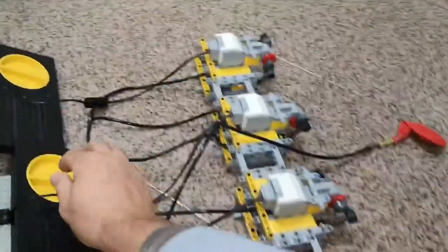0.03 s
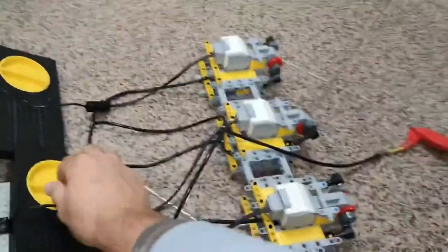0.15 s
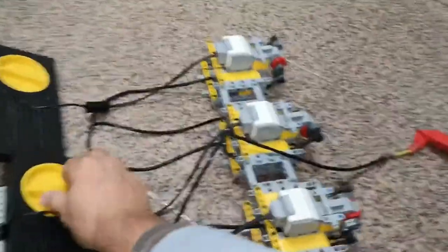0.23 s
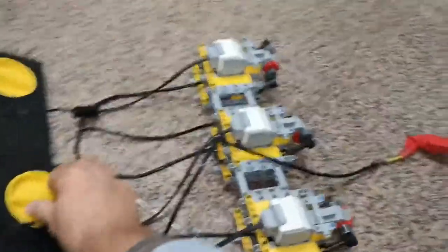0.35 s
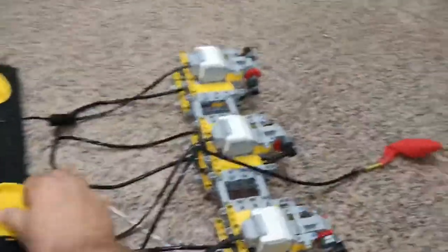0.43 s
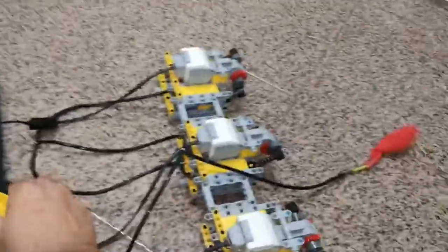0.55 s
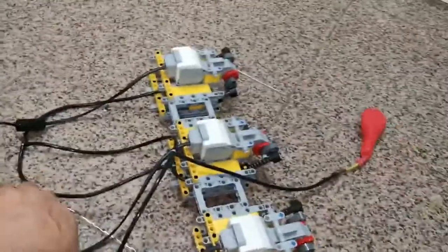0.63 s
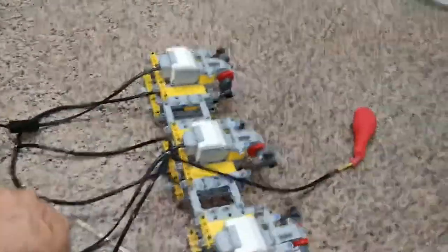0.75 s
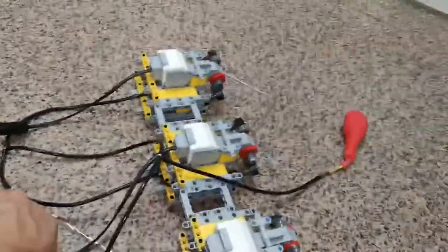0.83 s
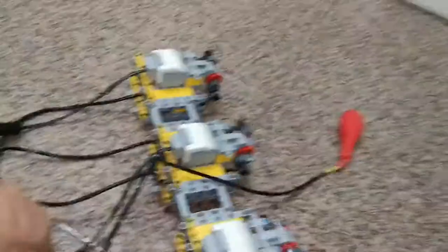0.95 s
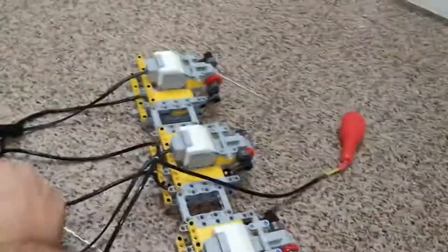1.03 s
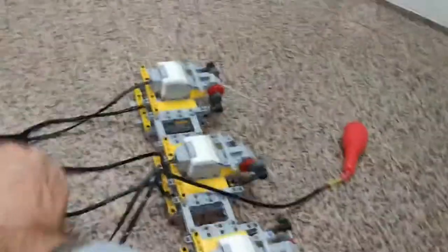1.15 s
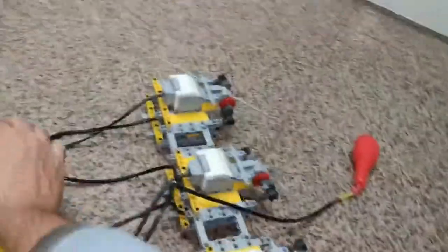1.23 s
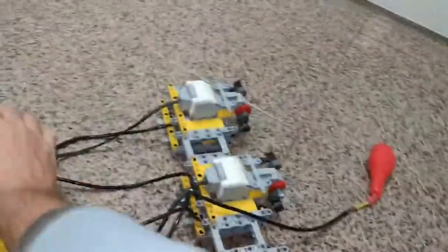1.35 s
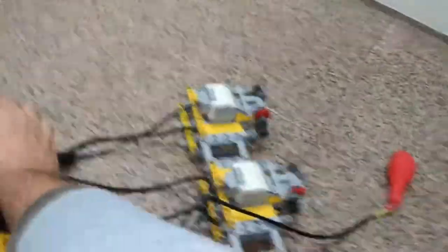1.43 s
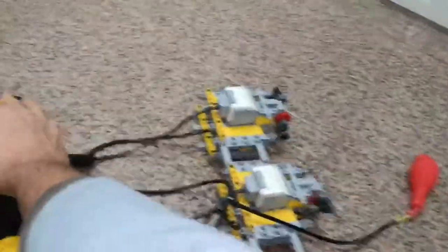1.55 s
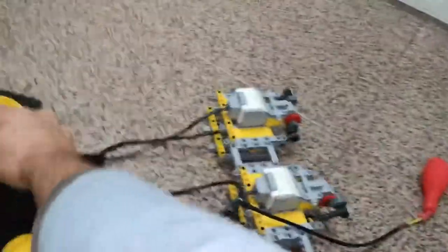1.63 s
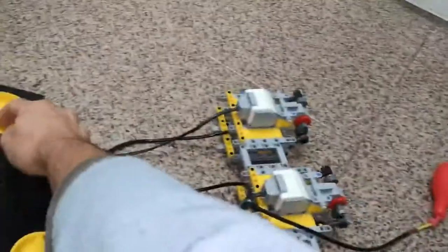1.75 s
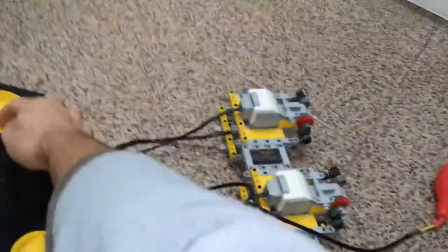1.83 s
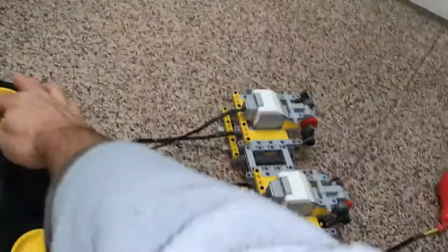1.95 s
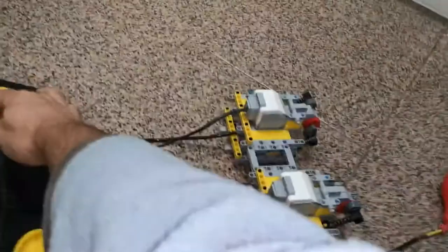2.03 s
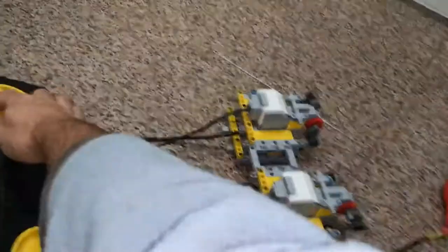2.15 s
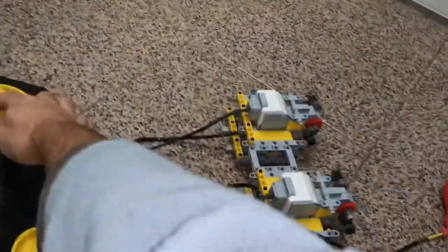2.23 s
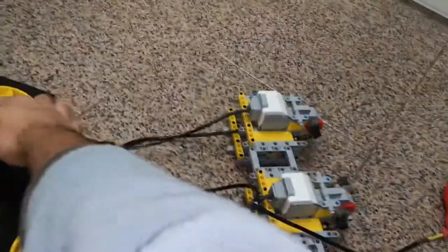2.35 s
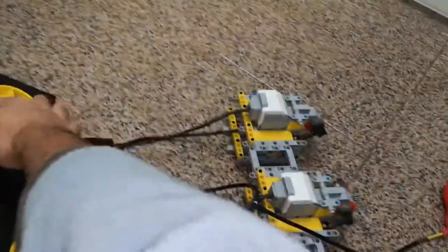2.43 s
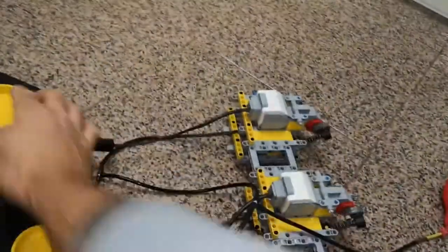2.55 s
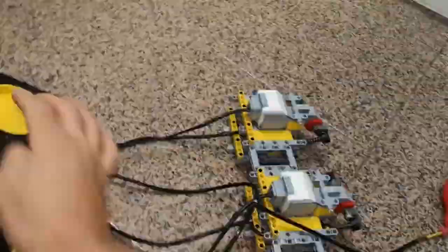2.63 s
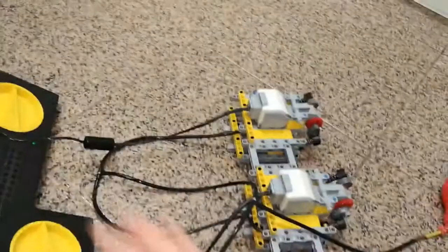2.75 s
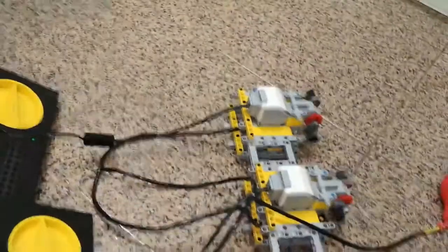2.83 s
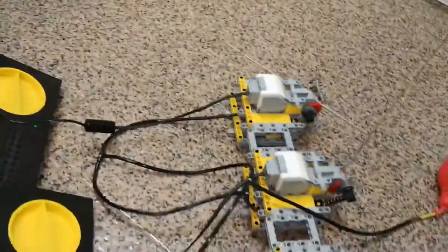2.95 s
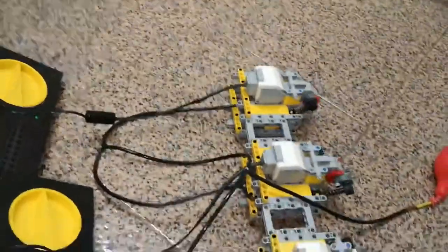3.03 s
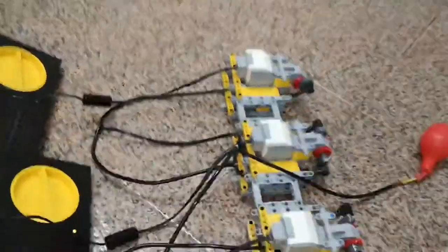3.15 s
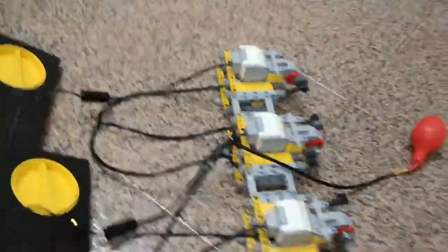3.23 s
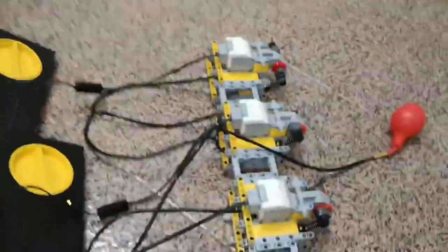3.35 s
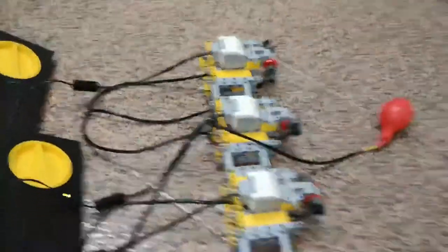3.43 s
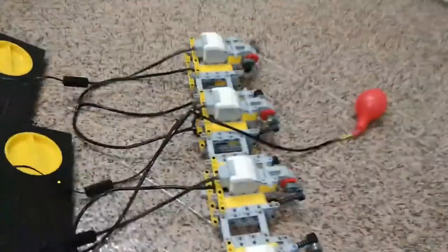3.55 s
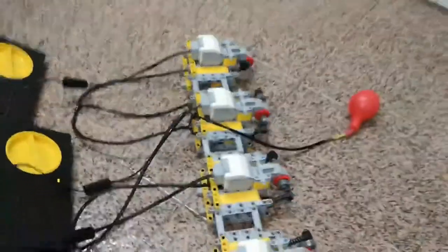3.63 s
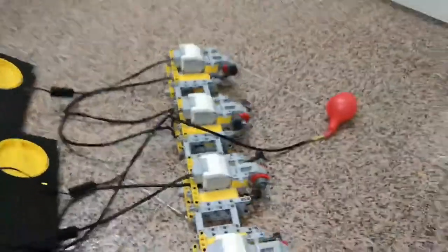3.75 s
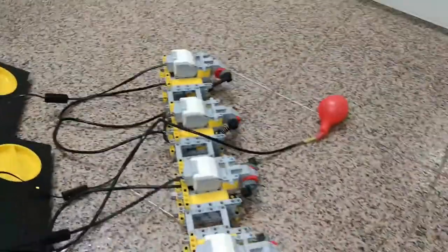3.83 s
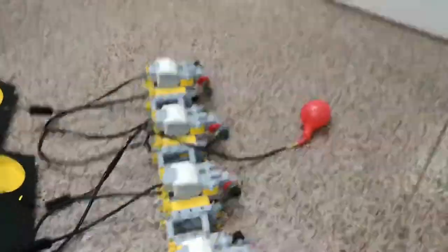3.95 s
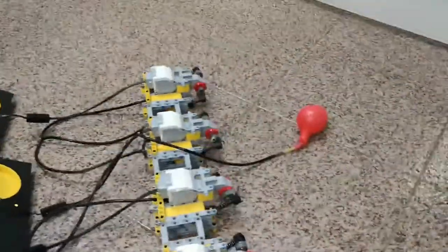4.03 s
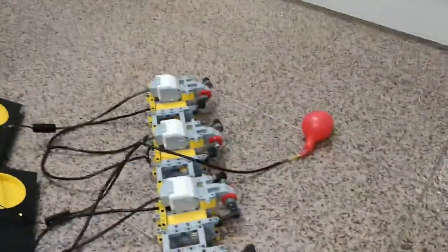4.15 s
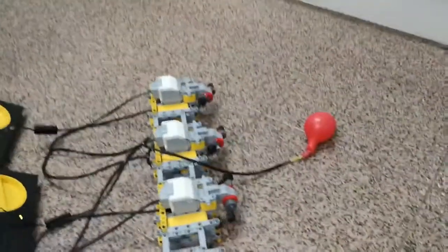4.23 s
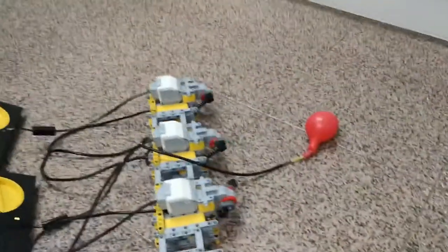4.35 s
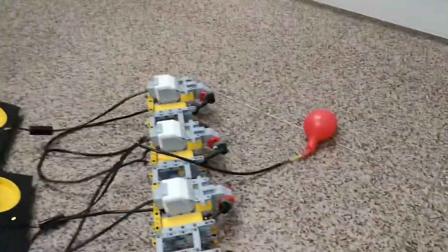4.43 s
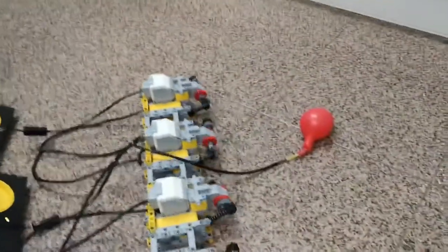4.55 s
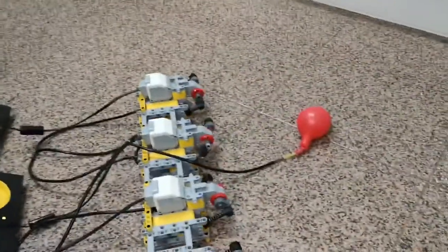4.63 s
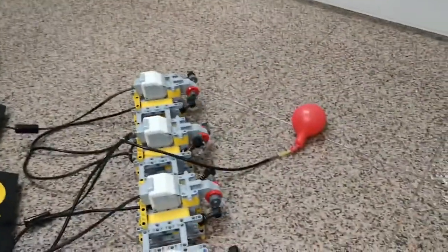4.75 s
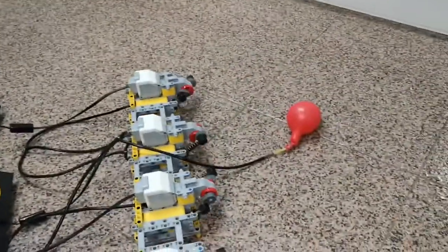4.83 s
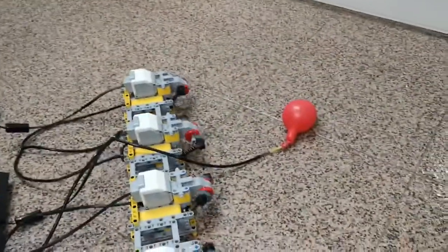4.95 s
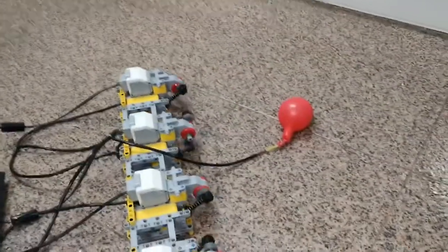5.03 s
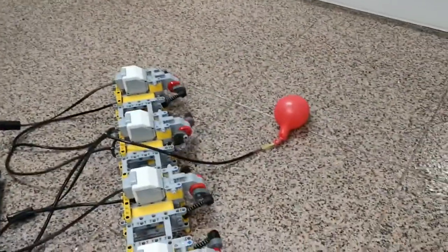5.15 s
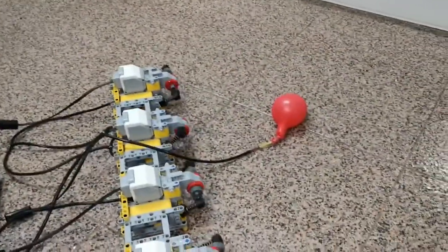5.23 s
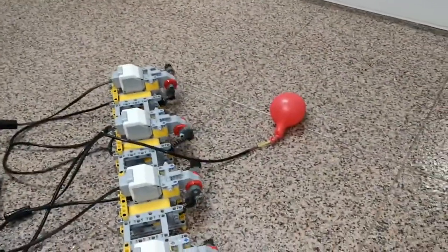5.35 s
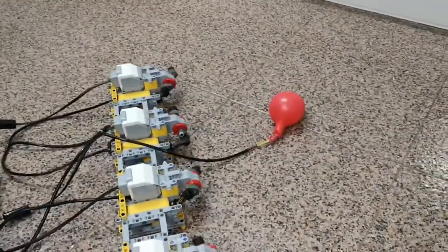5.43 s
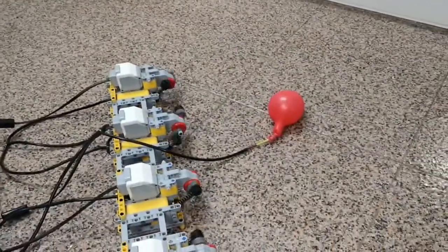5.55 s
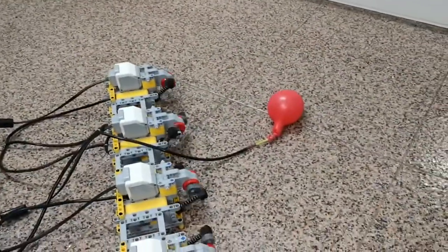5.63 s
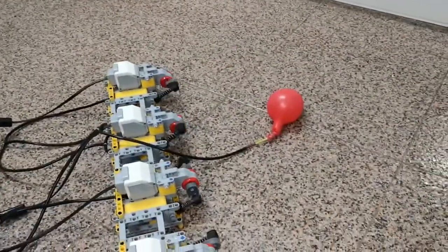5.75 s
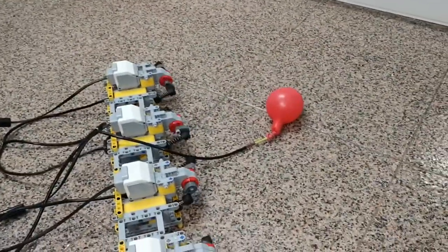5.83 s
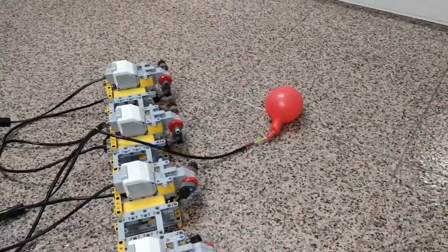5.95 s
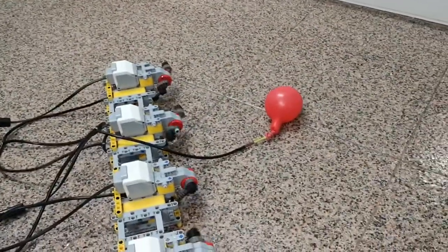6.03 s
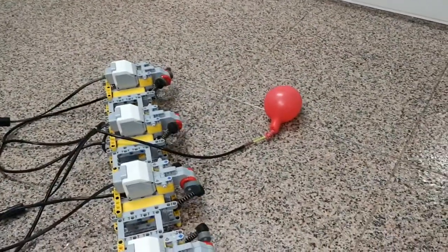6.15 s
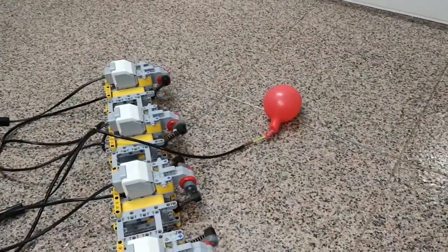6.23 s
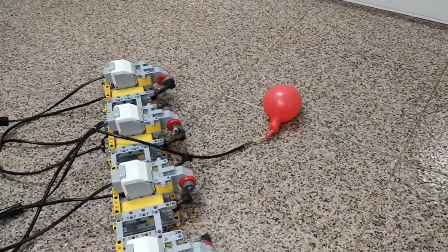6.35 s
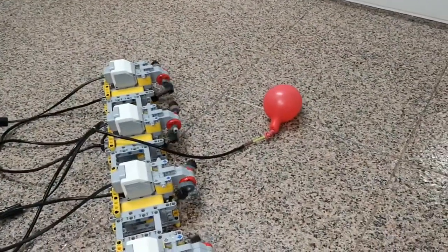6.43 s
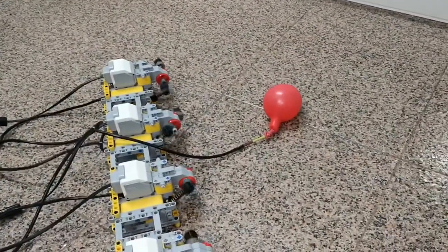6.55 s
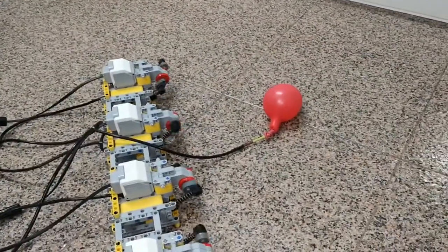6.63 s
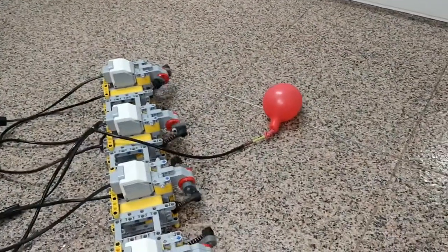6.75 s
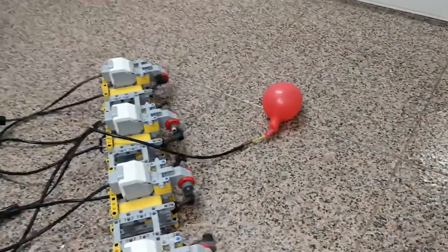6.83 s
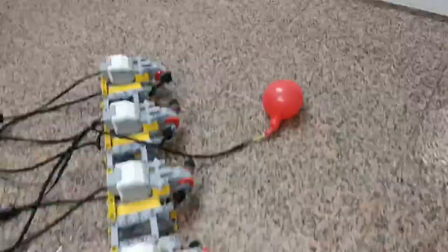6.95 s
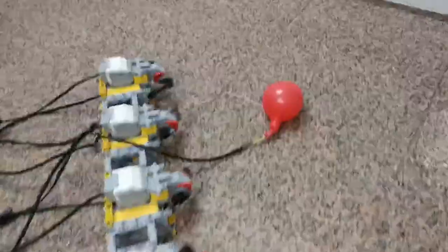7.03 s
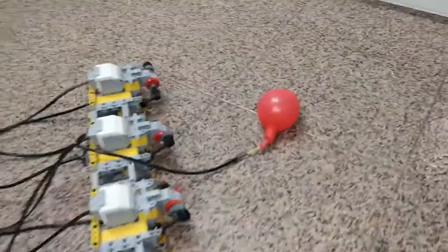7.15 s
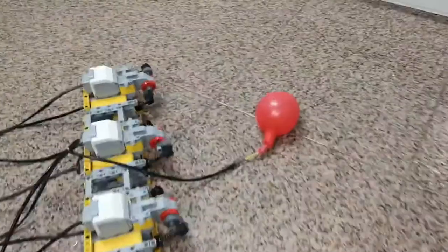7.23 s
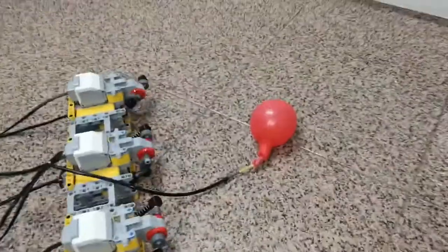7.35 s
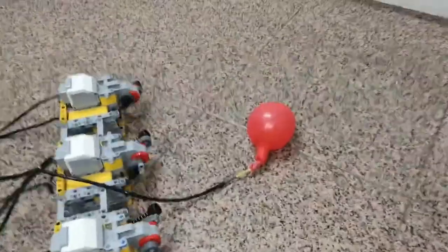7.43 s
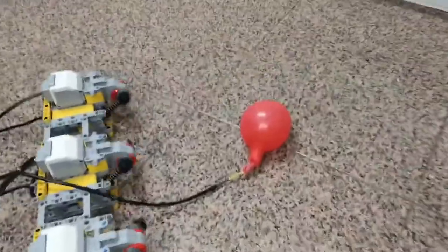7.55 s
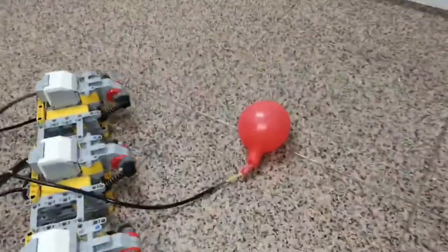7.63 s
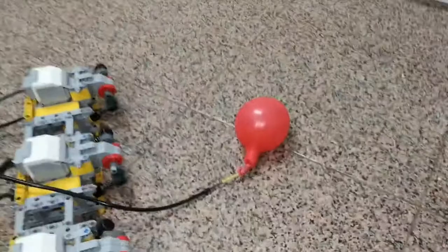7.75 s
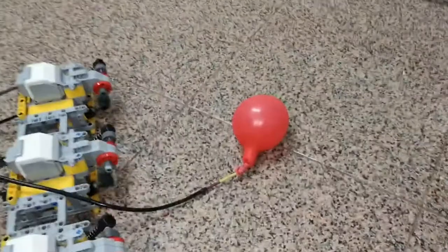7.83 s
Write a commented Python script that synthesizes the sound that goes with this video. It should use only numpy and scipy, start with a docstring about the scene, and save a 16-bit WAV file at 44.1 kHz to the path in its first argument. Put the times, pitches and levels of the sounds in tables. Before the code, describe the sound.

A toy-brick air compressor buzzes steadily with wavering motor whine and gritty gear chatter, plastic clacks early on, then soft low handling thumps.

```python
"""Throughout, four small geared motors on a plastic-brick frame crank air pumps into a balloon on a hard floor:
each stroke loads a motor, so its whine, a set of rotor-order tones, sags and recovers over noisy gear rattle.
In the first 2.7 s a hand knocks on the plastic speed controllers: clicks ring their modes, snaps top the hardest.
From 3.4 to 3.9 s the handheld recorder swings round; from then on grip thumps, damped low dips, come often.
A finger drags along the case at 6.7 s; rustle, rumble and a short room echo lie under everything."""
import sys
import numpy as np
from scipy import signal
from scipy.fft import irfft
from scipy.io import wavfile

SR = 44100
rng = np.random.default_rng(int(sys.argv[2]) if len(sys.argv) > 2 else 0)


def master(y):
    """Save y as 16-bit WAV."""
    cut = np.clip(np.atleast_2d(y).T, -1, 1)
    pcm = np.round(cut * 32767)  # scale
    wavfile.write(sys.argv[1], SR, pcm.astype(np.int16))


N = 348390

# motors, two near then two far: free_whine_hz, left_right_phase_rad, own_pan_db, upper_tilt_db_per_octave
MOTOR_BUILDS = [(2260, 0.41, 3.5, 7), (2152.4, 0.74, -2.5, -9), (2254, 3.35, -7, -12), (2079, 2.3, 8, -10)]
# near cranks, slowest when the balloon resists most, hard and soft strokes in turn: first_stroke_s, longest_gap_s,
# slowest_stroke_number, gap_cut_ms_per_stroke_squared, hard_early_and_soft_late_s, soft_whine_rise_hz, soft_gain_db
NEAR_CRANKS = [(-.171, .2624, 18.3, .0644, .005, 90, -0.5), (-.191, .2626, 19.8, .0877, .018, 70, 9)]
# load on the first near motor: time_s, hard_stroke_lowest_whine_hz, whine_level_db
FIRST_LOAD = [(0, 1643, -42), (.8, 1635, -41), (1.501, 1563, -50), (2.3, 1521, -41.5), (2.9, 1428, -43.5),
              (3.4, 1427, -40), (4.4, 1522, -42.5), (5, 1453, -44), (5.5, 1480, -43.5), (6.3, 1549, -41.5),
              (7, 1453, -49.5), (7.9, 1497, -41.5)]
# load on the second near motor: time_s, hard_stroke_lowest_whine_hz, whine_level_db
SECOND_LOAD = [(0, 1798, -53.5), (0.999, 1748, -49), (1.5, 1691, -45.5), (2.199, 1694, -55.5),
               (2.898, 1601, -48.5), (3.299, 1690, -55), (3.7, 1597, -47.5), (4.2, 1695, -47.5),
               (4.9, 1616, -52.5), (5.7, 1634, -48), (6.3, 1605, -55.5), (7, 1732, -54), (7.9, 1679, -52)]
# far motors on a steady beat: first_stroke_s, stroke_gap_s, lowest_whine_hz, whine_level_db
FAR_STROKES = [(-.1, .262, 1692, -56), (-.05, .248, 1802, -65)]
# prominent tones: rotor_speed_multiple, level_db
ROTOR_ORDERS = [(6, -3), (12, 0), (18, -8), (24, -16)]
# how the frame radiates tones: pitch_hz, gain_db
FRAME_RADIATION = [(600, -46), (950, -24.5), (1100, -0.5), (1300, -15), (1600, -0.5), (1800, 6.5),
                   (2000, 12), (2200, 8.5), (2450, 2.5), (2700, 3), (2900, 2), (3080, 14), (3250, 4.5),
                   (3600, 4.5), (4300, -14)]
# whine carry above 2 kHz as the recorder swings: time_s, gain_db
WHINE_TOP_GAIN = [(0, -1.5), (1, -0.5), (1.9, -5), (2.1, 1.5), (2.8, -0.5), (3.2, 6), (3.8, -1),
                  (4.3, -3.5), (5.4, -1), (6.3, -1), (7.1, 4), (7.9, 0.5)]
# recorder aim: time_s, pan_db, turned_away_0_to_1
RECORDER_AIM = [(0.0, 6, 0), (0.26, 4.5, 0), (0.51, 5.5, 0.06), (0.77, 4, 0.13), (1.23, 0, 0),
                (3.41, 1.5, 0), (3.9, -3.5, 0.87), (4.5, -4, 0.92), (6.45, -4, 0.9), (7.06, -3.5, 0.92),
                (7.39, -4.5, 0.97), (7.9, -5.5, 0.9)]
# rattle below 1.3 kHz: time_s, level_db
RATTLE_LOW_LEVEL = [(0, -9), (.5, -11.5), (1.3, -7), (2, -3), (3, -6.5), (4, -7), (5, -7.5), (6, -7.5),
                    (7, -8), (7.9, -4.5)]
# rattle above: time_s, level_1300_2500_hz_db, ring_3_khz_db, level_3300_4200_hz_db, ring_5_khz_db, treble_db
RATTLE_BAND_LEVELS = [(0, -7.5, -4, -3.5, 0.5, -9), (.45, -5, -6, -4.5, -3.5, -11.5),
                      (.8, -7.5, -3, -6, 0, -8.5), (1.3, -6.5, -3.5, -5.5, -2.5, -7),
                      (2, -5.5, -9, -7.5, -4, -8), (2.6, -7.5, -6.5, -6, -3, -7),
                      (2.9, -3, -3, -3.5, -1, -6), (3.6, -6, -3.5, -5, -1.5, -6.5),
                      (3.8, -4.5, -3.5, -3.5, 4, -7.5), (4.3, -6, -3, -7.5, 4.5, -5.5),
                      (4.5, -5, -5.5, -3.5, 2, -4), (5.7, -5, -5, -4, 3, -4.5),
                      (6.9, -3.5, -3.5, -4.5, 2, -4), (7.12, -4, -3.5, -3.5, 5, -4.5),
                      (7.5, -4.5, -3.5, -5, 5.5, -4.5), (7.9, -4, 1, -4, 5, -2.5)]
# each rattle band, low to high, follows the first motor's speed: speed_power, delay_s
RATTLE_SPEED_LAW = [(0.6, -0.063), (0.64, -0.035), (0.81, -0.0016), (0.87, 0.016), (0.6, -0.0052),
                    (0.7, -0.057)]
# rattle spectrum: pitch_hz, density_db_per_hz
RATTLE_SPECTRUM = [(210, -65), (350, -46), (600, -31), (872, -22.5), (1100, -14), (1290, -14.5),
                   (1830, -2.5), (2500, -1.5), (3070, -1), (4340, -6), (5320, -24), (6040, -6), (7290, -14),
                   (8010, -9), (10500, -4), (15000, -27)]
# rattle resonances: pitch_hz, width_hz, gain_db
FRAME_RINGS = [(1110, 130, 4.5), (1786, 92, 7.5), (3140, 114, 4), (3566, 130, 3.5), (4984, 398, 10.5),
               (5445, 300, 4.5), (7050, 560, 8.5), (10600, 2400, 1.5)]
# share of the pan taken by each rattle pitch: pitch_hz, share
RATTLE_PAN_SHARE = [(400, .3), (700, 0.27), (1300, 1.06), (2300, 0.49), (4300, 1.4), (8000, 0.82),
                    (14000, 0.94)]
# left-right likeness of noise, recorder facing: pitch_hz, likeness
FACING_LIKENESS = [(60, 1), (99, 0.97), (160, 0.99), (270, 1), (440, 0.15), (730, 0.04), (1200, 1),
                   (1980, 0.091), (3260, 0.054), (5370, 0.01), (8850, 0.96), (14600, 0.78)]
# left-right likeness of noise, recorder turned away: pitch_hz, likeness
TURNED_LIKENESS = [(60, 0.9), (99, 0.98), (160, 0.98), (270, 0.51), (440, -0.86), (730, -0.58),
                   (1200, 0.62), (1980, 0.33), (3260, 0.39), (5370, 0.11), (6800, 1), (8850, 0.84),
                   (14600, 0.56)]
# knocks: start_s, level_db, brightness_db_per_octave, pan_db, favoured_hz, favour_db, clatter_decay_s
KNOCK_EVENTS = [(0.056, -58, -1, 8, 400, 6, .01), (0.526, -34, -7, 3, 240, 9, 0.0073),
                (0.528, -42, 12, 4.5, 400, 1, 0.011), (0.534, -39.5, 4.5, -8, 397, 9, 0.011),
                (0.892, -51, 9.5, 6, 400, 10, 0.014), (1.666, -42, -11, -5, 450, 6, .01),
                (1.687, -30, -7.5, 3, 560, 4.5, 0.017), (1.719, -38.5, -1.5, 4, 300, 0, 0.015),
                (1.828, -50.5, 3, 5.5, 527, 9, 0.011), (1.914, -43, -9, -3, 403, -2, 0.0057),
                (1.93, -43, -3, 11, 397, 5, 0.0075), (2.095, -39.5, -4.5, 9, 520, 11.5, 0.011),
                (2.197, -45, -1, 11, 620, 10, 0.017), (2.318, -29, -3, 6.5, 312, 10, 0.011),
                (2.339, -50.5, 10, 8, 400, 6, 0.01), (2.384, -38.5, -7, 4, 400, 7.5, 0.02),
                (2.498, -35, -5.5, 4, 450, 7.5, 0.011), (2.64, -48.5, -6, -1, 600, 14.5, 0.018)]
# controller modes: pitch_hz, level_db, t60_s
CONTROLLER_MODES = [(245, 1.5, 0.035), (329, 2, 0.09), (420, 7, 0.042), (496, 11, 0.057), (606, 12, 0.037),
                    (827, 20, 0.024), (1070, 18, 0.015), (1457, 16.5, 0.031), (1986, 2.5, 0.078),
                    (2720, -4, 0.037), (3520, -23, 0.026), (4800, -12, 0.019)]
# plastic snaps on the hardest blows: start_s, level_db, top_hz
SNAP_EVENTS = [(.527, -14, 8000), (.533, -12, 5000), (.543, -18, 3000), (.893, -21, 4000),
               (.899, -25, 4000), (2.318, -21, 3600), (2.322, -19, 3600), (2.328, -21, 3600),
               (2.343, -23, 3000), (3.596, -19, 3600)]
# low thumps, first under a few knocks on the controllers, then from fingers shifting on the recorder: start_s,
# level_db, thump_hz, snap_db
THUMP_EVENTS = [(0.525, -23, 230, -6), (2.317, -34, 260, -10), (2.497, -29, 230, -10),
                (2.944, -34.5, 170.3, -10), (3.595, -19, 98.6, -3), (3.62, -38, 60.1, -20),
                (3.673, -35, 110, -10), (3.69, -39, 60, -15), (3.709, -36, 110, -15),
                (3.806, -40, 60.2, -15), (3.831, -36.5, 169.6, 0), (3.855, -30.5, 114, -15),
                (3.878, -34, 62, -19), (3.936, -45, 89.5, -15), (5.303, -32.5, 125.2, -17),
                (5.316, -36, 110, -20), (5.354, -44, 188.8, -13), (5.413, -50, 189, -2),
                (5.477, -46, 160, -3), (5.515, -44, 170, -2), (5.561, -34, 120.1, -29),
                (5.574, -40, 85, -31), (5.61, -40, 119.6, -8), (5.683, -33, 105, -20),
                (5.695, -39, 80.7, -20), (5.752, -34.5, 120, 7.5), (5.868, -31.5, 110, 5),
                (6.198, -44.5, 189, -22), (6.654, -37, 94.2, -14), (6.859, -43.5, 198.6, -16),
                (7.389, -39, 166, 5), (7.611, -31, 105.3, -24), (7.729, -32, 100, -1),
                (7.788, -40.5, 199, 6)]
# restlessness of the grip: time_s, rumble_db, rustle_db
GRIP_LEVELS = [(0, -58, -71), (1, -61.5, -67), (1.6, -58, -69.5), (2.8, -56, -72), (3.4, -60.5, -65.5),
               (3.58, -59, -64), (3.66, -48, -49), (3.9, -53.5, -59.5), (4.2, -54, -65), (5.2, -61, -67.5),
               (5.7, -51, -66), (6.1, -60, -64), (7.1, -59.5, -72.5), (7.4, -62, -49), (7.9, -58, -63.5)]
# handling rumble spectrum: pitch_hz, density_db_per_hz
RUMBLE_SPECTRUM = [(8.8, -30), (15, -4), (32, 4), (60, 1), (182, -8.5), (332, -10.5), (378, -19),
                   (500, -28), (650, -50), (1100, -120)]

DWELL_POWER = .9   # below 1 the motor lingers under load
LABOUR_DB = 2   # the whine swells at the bottom of each stroke
GLIDE_LOSS_DB, STROKE_SPREAD_DB = 2, 1   # the whine fades while the speed drops; strokes differ in strength
RATTLE_DB = -29
TURNED_LAG_S = .00015   # fully turned away, the right port hears the rattle this much later
THUMP_DAMPING_NEPERS_PER_CYCLE = 2.8
THUMP_CUT_HZ = 38   # the microphone lets the lowest part of a thump swing back
SLIDE_S, SLIDE_LENGTH_S, SLIDE_HZ, SLIDE_DB = 6.68, 0.15, 110, -44.5
ROOM_T60_S, WALL_CUT_HZ = 0.3, 2400
CUTOFF_HZ = 15150


def from_db(db):
    """Decibels to gain."""
    return 10 ** (np.asarray(db) / 20)


def rms_one(x):
    """Scale to unit rms."""
    return x / np.sqrt(np.mean(x ** 2) + 1e-20)


def in_time(rows):
    """Table columns as signals."""
    time_s, *columns = np.transpose(rows)
    return [np.interp(np.arange(N) / SR, time_s, column) for column in columns]


def at_hz(points, hz):
    """Read a spectrum on a log-frequency axis."""
    pitch_hz, value = np.transpose(points)
    return np.interp(np.log(hz), np.log(pitch_hz), value)


def panned(pan_db):
    """Left and right gains."""
    return from_db(np.array([pan_db / 2, -pan_db / 2]))


def filtered(x, order, cut_hz, kind):
    """Butterworth filter."""
    return signal.sosfilt(signal.butter(order, cut_hz, kind, fs=SR, output="sos"), x)


def drift(rate_hz):
    """Slow random wander of spread 1, made at 1/40 of the sample rate."""
    r = np.exp(-80 * np.pi * rate_hz / SR)
    white = rng.standard_normal(N // 40 + 2002)
    slow = signal.lfilter([1], [1, -2 * r, r * r], white)[2000:]
    return np.interp(np.arange(N) / 40, np.arange(len(slow)), rms_one(slow))


def ring(clicks, hz, t60_s):
    """A unit click sets a decaying sine of height 1 ringing."""
    r, w = from_db(-60 / (t60_s * SR)), 2 * np.pi * hz / SR
    return signal.lfilter([0, np.sin(w)], [1, -2 * r * np.cos(w), r * r], clicks + 1e-18)


def boost(x, hz, width_hz, gain_db):
    """A resonance added on top of the signal."""
    r = np.exp(-np.pi * width_hz / SR)
    poles = [1, -2 * r * np.cos(2 * np.pi * hz / SR), r * r]
    peak = signal.lfilter([(1 - r * r) / 2, 0, (r * r - 1) / 2], poles, x)
    return x + (from_db(gain_db) - 1) * peak


def banded_noise(white, spectrum, edges_hz, colour_db, turned, shared_db, own_db, lag_s=0):
    """Bands of stereo noise, each with its own level, flicker and left-right likeness."""
    out, together = np.zeros((2, 2, N)), drift(9.5)
    for k, (low_hz, high_hz) in enumerate(zip(edges_hz, edges_hz[1:])):
        mid, side = filtered(white[k % 2], 2, [low_hz, high_hz], "band")
        hz = np.sqrt(low_hz * high_hz)
        alike = (1 - turned) * at_hz(FACING_LIKENESS, hz) + turned * at_hz(TURNED_LIKENESS, hz)
        alike = np.clip(alike, -1, 1)
        valley = 400 < hz < 950   # the quiet valley flickers most
        flicker_db = shared_db * together + own_db * (1 + valley) * drift(12.0)
        gain = from_db(at_hz(spectrum, hz) + colour_db(hz) + flicker_db)
        stereo = np.sqrt(1 + alike) * mid + np.sqrt(1 - alike) * side * [[1], [-1]]
        out[int(hz > 6500)] += gain * stereo
    # the top treble stays in step
    out[0, 1] = np.interp(np.arange(N) - lag_s * SR * turned, np.arange(N), out[0, 1])
    return out.sum(axis=0)


def motors():
    """Four motors under pump load: summed tones, each rotor's turns and relative speed."""
    near = [strokes(load, *crank) for load, crank in zip([FIRST_LOAD, SECOND_LOAD], NEAR_CRANKS)]
    far = [[(first_s + k * gap_s, hz, db) for k in range(36)] for first_s, gap_s, hz, db in FAR_STROKES]
    tones, turns, speeds = zip(*[
        motor(rows, *build, peak_at=.56, jitter=.005, rough_db=2.2, relief_db=14)
        for rows, build in zip(near + far, MOTOR_BUILDS)])
    return sum(tones), turns, speeds


def strokes(load, first_s, gap_s, slowest, bend_ms, early_s, soft_hz, soft_db):
    """One crank's hard and soft strokes in turn: start_s, lowest_whine_hz, whine_level_db."""
    k = np.arange(35)
    soft = k % 2
    bend_s = bend_ms / 3000 * ((k - slowest) ** 3 + slowest ** 3)
    start_s = first_s + gap_s * k - bend_s - early_s * (1 - 2 * soft)
    load_s, low_hz, level_db = np.transpose(load)
    stroke_hz = np.interp(start_s, load_s, low_hz) + soft_hz * soft
    stroke_db = np.interp(start_s, load_s, level_db) + soft_db * soft
    return np.transpose([start_s, stroke_hz, stroke_db])


def motor(stroke_rows, free_hz, phase_rad, pan_db, tilt_db, peak_at, jitter, rough_db, relief_db):
    """Speed swings from a loaded stroke up to free running and down again, moving the rotor-order tones."""
    start_s, low_hz, level_db = np.transpose(stroke_rows)
    count = np.arange(len(start_s))
    stroke = np.interp(np.arange(N) / SR, start_s, count)
    # slow recovery, quick fall: 0 and 1 loaded, .5 free
    part = np.interp(stroke % 1, [0, np.clip(peak_at, .2, .8), 1], [0, .5, 1])
    sag = (.5 + .5 * np.cos(2 * np.pi * part)) ** DWELL_POWER
    whine_hz = free_hz - sag * (free_hz - np.interp(stroke, count, low_hz))
    rotor_hz = whine_hz / 12 * (1 + jitter * drift(30))
    turns = np.cumsum(rotor_hz) / SR

    # teeth unload while the motor speeds up
    loss_db = relief_db * np.interp(part, [0, .13, .24, .4, .5, .64, 1], [0, 0, 1, 1, .1, .2, 0])
    loss_db = loss_db + GLIDE_LOSS_DB * np.maximum(-np.sin(2 * np.pi * part), 0)
    level_db = level_db + STROKE_SPREAD_DB * rng.standard_normal(len(start_s))
    top_db = in_time(WHINE_TOP_GAIN)[0] * np.clip((whine_hz - 1900) / 250, 0, 1)

    sides = .8 * np.array([drift(15), drift(15)])
    tones = 0
    for multiple, order_db in ROTOR_ORDERS:
        # uneven teeth, a little apart at each side
        uneven_db = rough_db * max(multiple / 12, 1) * (drift(35) + sides)
        order_tilt_db = tilt_db * np.log2(np.clip(multiple / 12, 1, 1.5))
        tone_hz = multiple * rotor_hz
        gain = from_db(order_db + order_tilt_db + at_hz(FRAME_RADIATION, tone_hz) + uneven_db)
        if multiple > 12:   # upper tones fade out below the frame's upper rings
            gain = gain * np.clip((tone_hz - 2200) / 400, .1, 1)
        tones = tones + gain * np.sin(2 * np.pi * multiple * turns + phase_rad * np.array([[0], [1]]))
    stroke_db = np.interp(stroke, count, level_db)
    level = from_db(stroke_db - loss_db + top_db + LABOUR_DB * (sag - .5))
    return tones * level * panned(pan_db)[:, None], turns, whine_hz / free_hz


def rattle(turns, speed, pan_db, turned):
    """Gear teeth and brushes blur into noise that rings in the brick frame and sinks as the motor labours."""
    t = np.arange(N) / SR
    speed_db = 20 * np.log10(speed)
    levels_db = in_time(RATTLE_LOW_LEVEL) + in_time(RATTLE_BAND_LEVELS)
    bands_db = [level_db + power * np.interp(t - delay_s, t, speed_db)
                for level_db, (power, delay_s) in zip(levels_db, RATTLE_SPEED_LAW)]

    def colour_db(hz):
        """Band level plus its share of the pan."""
        band = np.searchsorted([1300, 2500, 3300, 4200, 6200], hz)
        return bands_db[band] + at_hz(RATTLE_PAN_SHARE, hz) * pan_db * [[.5], [-.5]]

    edges_hz = 330 * 2 ** np.arange(0, 5.8, 1 / 4)
    teeth = tooth_noise(turns, repeating=.62, uneven_db=4)
    noise = banded_noise(teeth, RATTLE_SPECTRUM, edges_hz, colour_db, turned,
                         shared_db=0.68, own_db=1.27, lag_s=TURNED_LAG_S)
    for mode in FRAME_RINGS:
        noise = boost(noise, *mode)
    return from_db(RATTLE_DB) * rms_one(noise)


def tooth_noise(turns, repeating, uneven_db):
    """Part of the gear noise repeats on every rotor turn, its orders uneven in strength; the rest is new."""
    order = np.arange(241)
    shape = (4, len(turns), 241)
    strength_db = uneven_db * (order < 60) * np.clip(rng.standard_normal(shape[1:]), -2, 1.3)
    orders = from_db(strength_db) * np.exp(2j * np.pi * rng.random(shape))
    patterns = irfft(orders * (order < 120))   # 480 steps a turn
    steps = [(480 * turn).astype(int) % 480 for turn in turns]
    looped = np.array([sum(p[step] for p, step in zip(draw, steps)) for draw in patterns])
    fresh = rng.standard_normal((4, N))
    mixed = np.sqrt(repeating) * rms_one(looped) + np.sqrt(1 - repeating) * fresh
    return mixed.reshape(2, 2, N)


def knocks():
    """A firm contact and a short ragged clatter ring the controller modes, each mode by its own strength."""
    out, t = np.zeros((2, N)), np.arange(SR // 20) / SR
    chance = rng.standard_normal((len(KNOCK_EVENTS), len(t) + len(CONTROLLER_MODES)))
    contact = 10.2 * (np.arange(len(t)) == 40)
    for m, (hz, mode_db, t60_s) in enumerate(CONTROLLER_MODES):
        clicks = np.zeros((2, N + len(t)))
        for k, (start_s, level_db, bright_db, pan_db, favoured_hz, favour_db, decay_s) in enumerate(KNOCK_EVENTS):
            ragged = chance[k, :len(t)] ** 3 / 4
            clatter = 0.82 * ragged * np.exp(-t / decay_s) * np.minimum(t / 0.0028, 1)
            favour = np.exp(-(np.log2(hz / favoured_hz) / 0.3) ** 2)
            luck_db = 1.3 * chance[k, len(t) + m] + favour_db * favour
            gain = from_db(level_db + mode_db + bright_db * np.log2(hz / 450) + luck_db - 30.0)
            sides = panned(pan_db * min(hz / 600, 1))[:, None]
            clicks[:, round(start_s * SR):][:, :len(t)] += gain * sides * (clatter + contact)
        # half the modes reach the ports out of phase
        out += ring(clicks[:, :N], hz, t60_s) * [[1], [(-1) ** m]]
    return filtered(out, 3, 200, "high")


def snaps():
    """Each snap is bright noise with a 3 ms decay constant, partly shared by the two sides."""
    out, t = np.zeros((2, N)), np.arange(SR // 50) / SR
    for start_s, level_db, top_hz in SNAP_EVENTS:
        burst = rng.standard_normal(len(t)) + .5 * rng.standard_normal((2, len(t)))
        snap = filtered(burst * np.exp(-t / .003), 2, [900, top_hz], "band")
        out[:, round(start_s * SR):][:, :len(t)] += from_db(level_db) * snap
    return out


def thumps():
    """Each thump is a growing squeeze, a short upward snap, then a sudden, heavily damped low dip."""
    out, t = np.zeros(N + SR), np.arange(SR // 8) / SR
    late_s = np.maximum(t - .0012, 0)
    squeeze = np.exp(-t / 0.0026) * np.minimum(t / 0.0015, 1)   # laid in backwards
    for start_s, level_db, hz, snap_db in THUMP_EVENTS:
        start = round(start_s * SR)
        damping = np.exp(THUMP_DAMPING_NEPERS_PER_CYCLE * (1 / 4 - hz * late_s))
        dip = -np.sin(2 * np.pi * hz * late_s) * damping
        snap = from_db(snap_db) * np.sin(2 * np.pi * 400 * t) * np.exp(-t / 0.0012)
        out[start:][:len(t)] += from_db(level_db) * (dip + snap)
        out[:start + 40][:-len(t) - 1:-1] += from_db(level_db - 7.5) * squeeze
    out = filtered(out, 1, THUMP_CUT_HZ, "high")
    return np.array([out[16:N + 16], out[:N]])   # the shock reaches the left port a little first


def slide():
    """A finger drags along the case: a short low noise drone, fast in and slow out."""
    part = (np.arange(N) / SR - SLIDE_S) / SLIDE_LENGTH_S
    noise = filtered(rng.standard_normal(N), 2, [SLIDE_HZ / 1.2, SLIDE_HZ * 1.07], "band")
    return from_db(SLIDE_DB) * rms_one(noise) * np.interp(part, [0, .1, .7, 1.1], [0, 1, .8, 0])


def rustle():
    """Small slips of cloth and skin: uneven low ticks, partly different at each port."""
    hits = rng.random((3, N)) < 150 / SR   # 150 per s in each stream
    strength = from_db(4 * np.minimum(rng.exponential(1, (3, N)), 4))
    ticks = hits * strength * rng.choice([-1, 1], (3, N))
    both = ticks[0] + 2.04 * ticks[1:] + 1e-18
    return from_db(in_time(GRIP_LEVELS)[1]) * rms_one(filtered(both, 3, [130, 380], "band"))


def rumble(turned):
    """The grip shakes the recorder: flickering bands of low noise."""
    edges_hz = 14 * 2 ** np.arange(0, 5.6, .5)
    white = rng.standard_normal((2, 2, N))
    noise = banded_noise(white, RUMBLE_SPECTRUM, edges_hz, lambda hz: 0, turned, shared_db=2.5, own_db=3.5)
    return from_db(in_time(GRIP_LEVELS)[0]) * rms_one(noise)


def room(x):
    """Six feedback delays a side, duller on every round."""
    out, dull = np.zeros((2, N)), np.exp(-2 * np.pi * WALL_CUT_HZ / SR)
    lags = (rng.uniform(0.025, 0.044, 12) * SR).astype(int)
    for k, lag in enumerate(lags):
        loop, gain, state = x.copy(), from_db(-60 * lag / SR / ROOM_T60_S), [0.]
        for i in range(lag, N, lag):
            back, state = signal.lfilter([gain * (1 - dull)], [1, -dull], loop[i - lag:i], zi=state)
            loop[i:i + lag] += back[:N - i]
        out[k % 2] += (loop - x) * (-1) ** (k // 2)
    return out


def scene():
    """Motors panned by the recorder's aim, knocks, room echoes of both, handling noise."""
    pan_db, turned = in_time(RECORDER_AIM)
    turned = np.clip(turned, 0, 1)
    tones, turns, speeds = motors()
    machine = panned(pan_db) * tones + rattle(turns, speeds[0], pan_db, turned)
    hand = knocks() + snaps()
    handling = thumps() + slide() + rustle() + rumble(turned)
    echoes = room(from_db(-16) * hand[0] + from_db(-7.5) * tones[0])
    return machine + hand + handling + echoes


def record(dry):
    """A steep elliptic low-pass cuts the top."""
    return signal.sosfilt(signal.ellip(12, .5, 80, CUTOFF_HZ, fs=SR, output="sos"), dry)


dry = scene()
out = record(dry)
master(out)
```